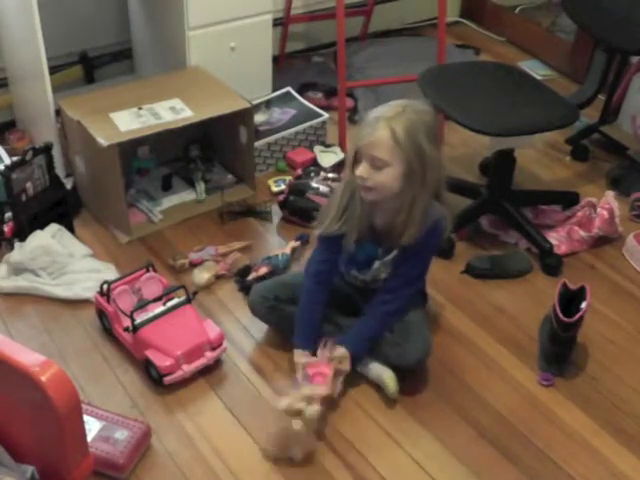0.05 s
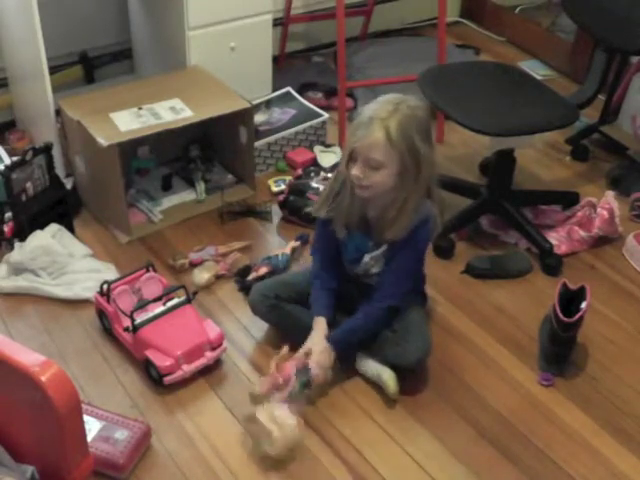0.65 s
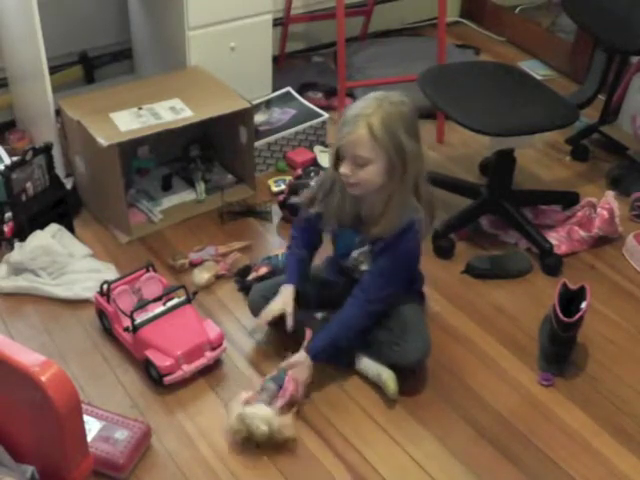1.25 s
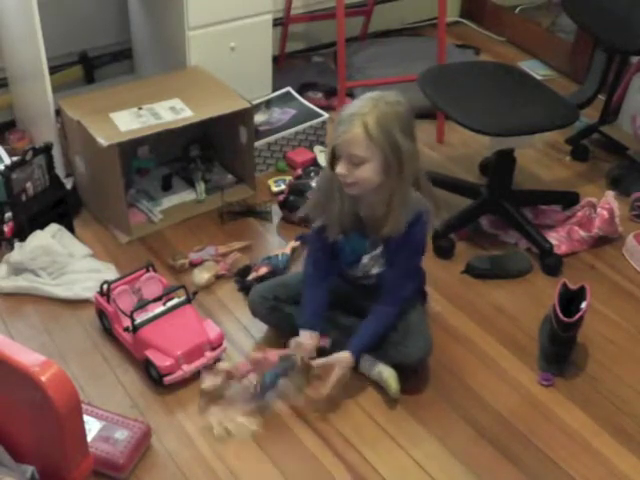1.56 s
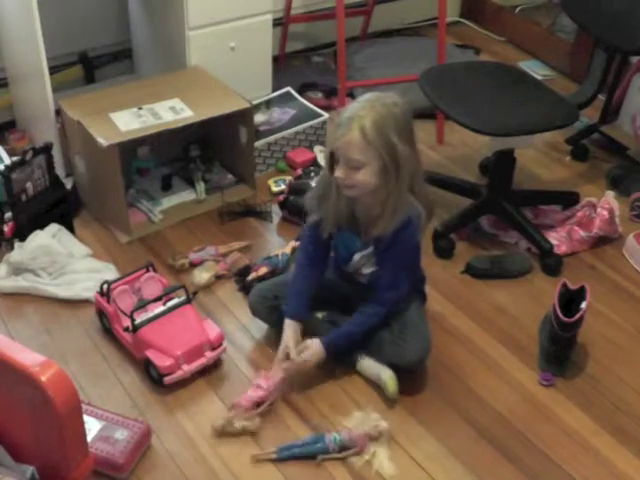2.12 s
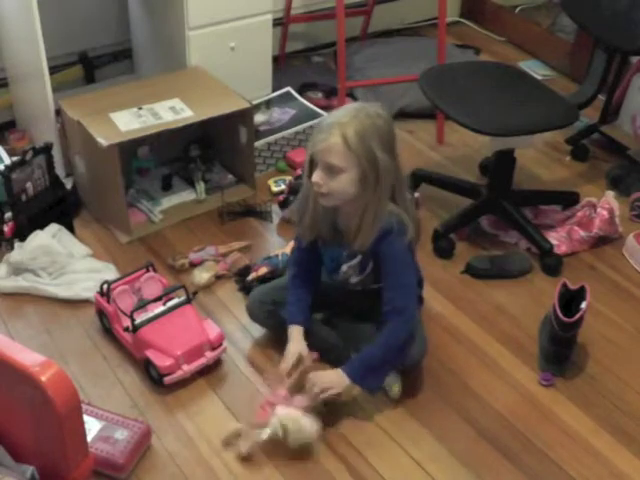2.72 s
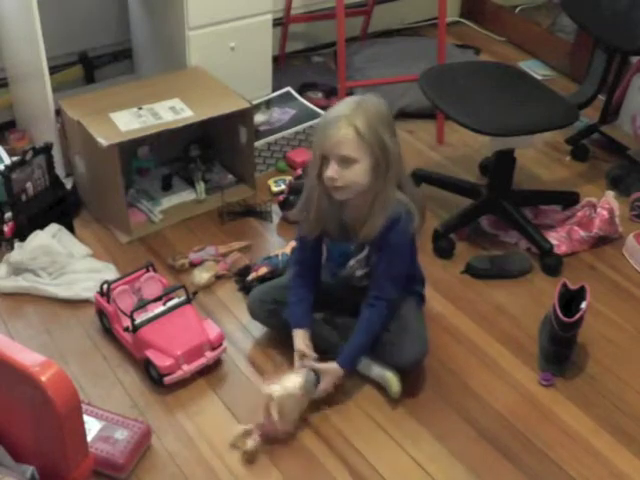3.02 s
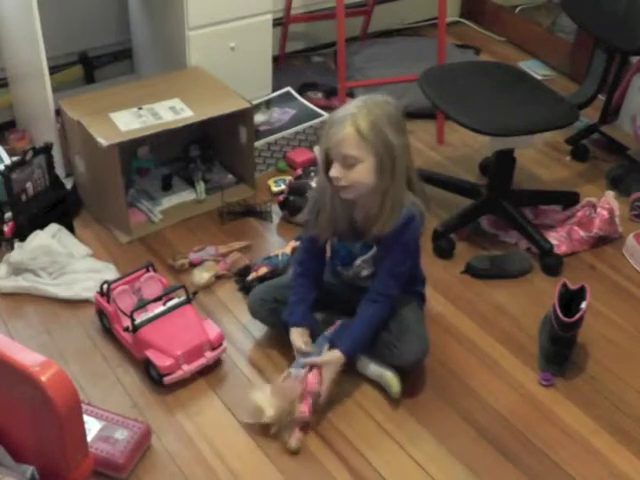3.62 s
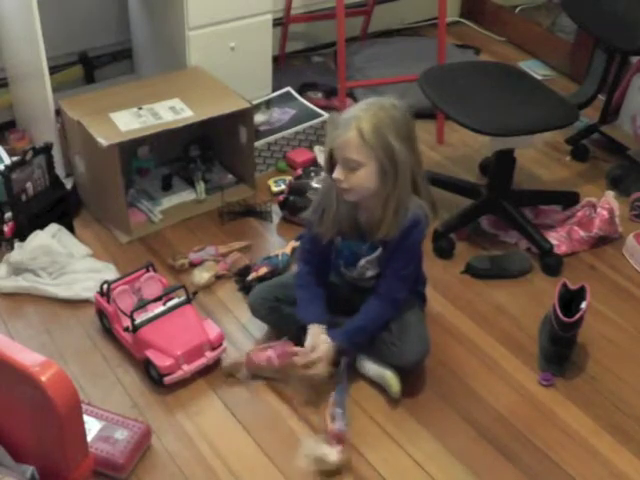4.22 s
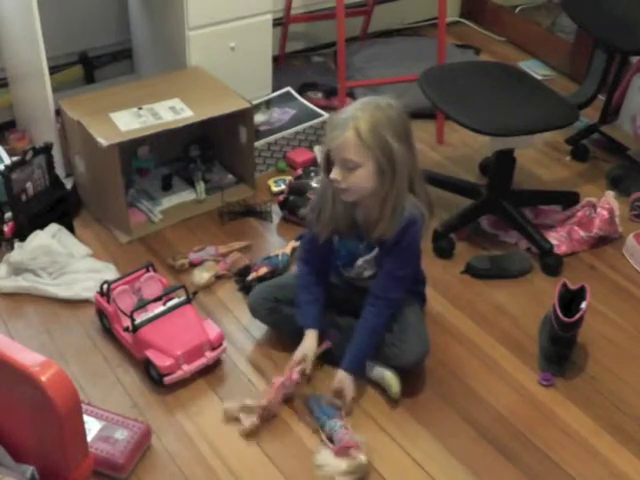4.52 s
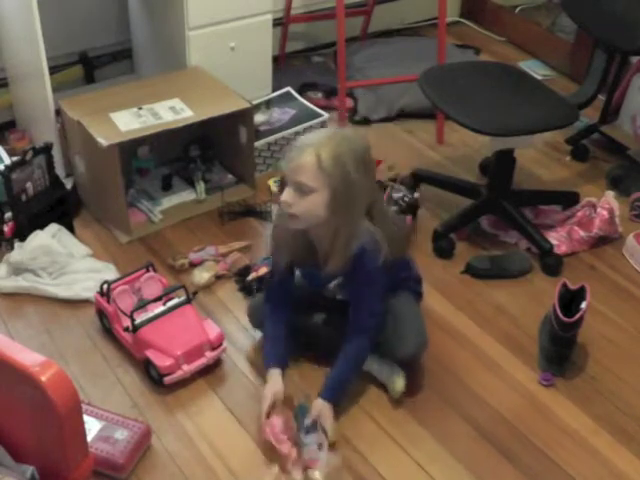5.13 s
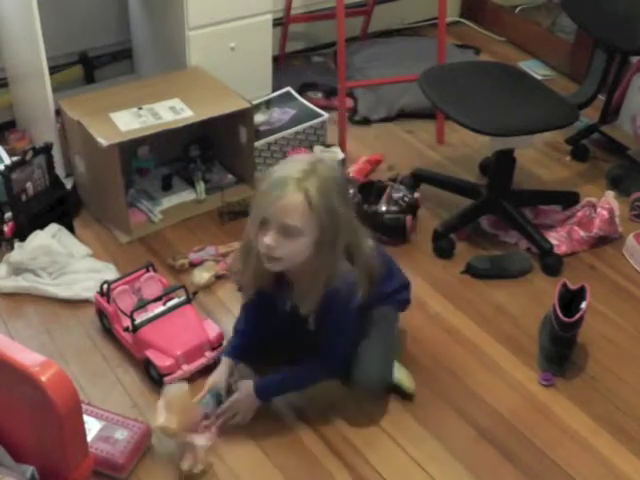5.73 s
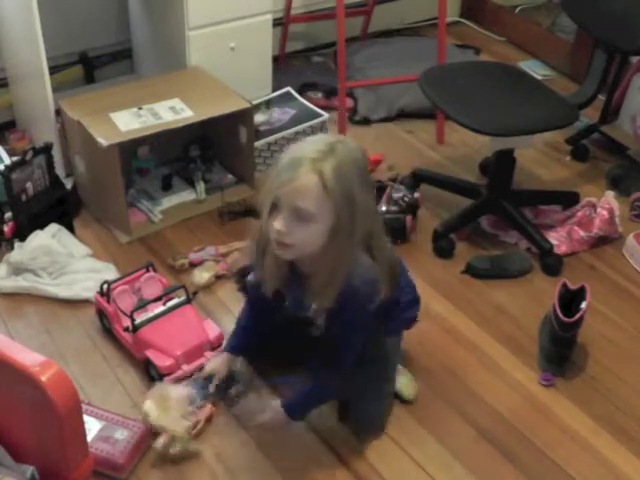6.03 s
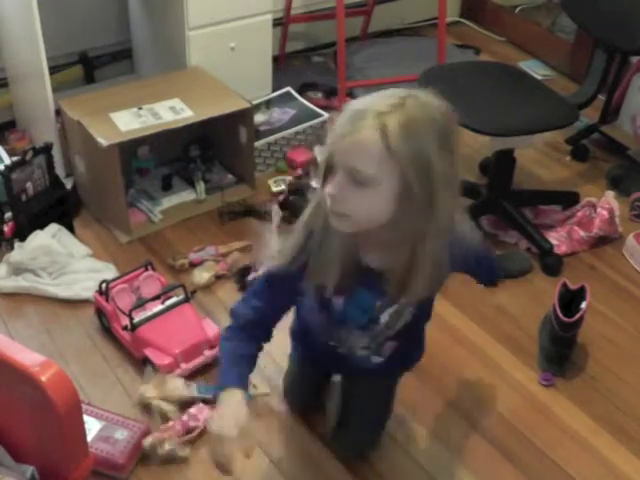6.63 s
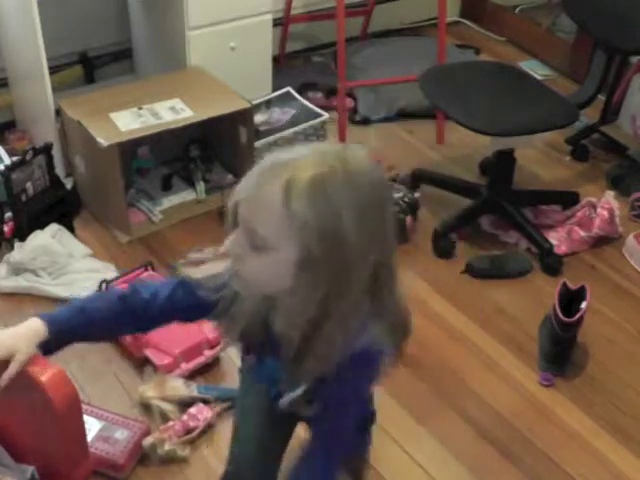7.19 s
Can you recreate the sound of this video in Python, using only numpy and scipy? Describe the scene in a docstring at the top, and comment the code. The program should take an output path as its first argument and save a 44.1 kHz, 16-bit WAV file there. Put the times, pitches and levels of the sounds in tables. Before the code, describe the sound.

Uneven wooden knocks and bright plastic clicks come from dolls being played with on floorboards, bunching into quick clatters with one short dragging scrape. Later the floor gives a low groan, and the clicking gives way to a few dull thuds and a knee rubbing along the wood. Soft cloth rustle and a faint house hush lie underneath. The microphone picks up the brief ring of a small room, with the thumps slightly to the right.

```python
"""A plastic doll thumps on a wooden floor, and clothes rustle as a child plays in a small, quiet room.
Each thump shakes the floorboards and makes the room ring. Two dolls' hard limbs click and clatter,
their hollow bodies give a dry "tock", and one doll scrapes as it is dragged across the floor.
Near the end a board groans, the child shuffles onto the knees with duller thuds, and a sleeve swishes.
The hits are built from quickly fading tones, the rubbing sounds from noise and tiny slips."""
import sys
import numpy as np
from scipy import signal
from scipy.fft import rfft, irfft, next_fast_len
from scipy.io import wavfile
from scipy.ndimage import uniform_filter1d

SR = 44100
rng = np.random.default_rng(int(sys.argv[2]) if len(sys.argv) > 2 else 0)


def master(y):
    """Save y as 16-bit WAV."""
    cut = np.clip(np.atleast_2d(y).T, -1, 1)
    pcm = np.round(cut * 32767)  # scale
    wavfile.write(sys.argv[1], SR, pcm.astype(np.int16))


N = 320166

# a doll lands on the boards; body, hardness and clack set its low-middle, middle and high tones:
# start_s, boom_db, body_db, hardness_db, clack_db, pitch_ratio, wall_distance_m
DOLL_THUMPS = [(-.035, -17, 7, 2, 4, 1, 1.58), (.4448, -16, 0, 0, -6, .96, 1.88),
               (.9015, -12.5, 0, -5, -7, .97, .96), (.9196, -23, 7, 8, 15, 1.1, .96),
               (1.2345, -14.5, 1, 2, -4, 1.02, .36), (1.5313, -11.5, -2, 1, 0, 1.05, 2.56),
               (1.871, -21, -8, -14, -23, .95, .6), (1.91, -23, -4, -9, -12, 1, 3),
               (2.002, -15, 2, 8, 9, 1.01, 2.88), (2.1115, -21, 3, 3, -7, 1, 2.9),
               (2.243, -21, -9, -3, -7, 1, 2.56), (2.465, -30, 2, 2, 4, .97, 2.94),
               (2.49, -33, 1, -2, 0, 1, 2.94), (2.533, -31, -1, -4, -8, 1.05, 2.94),
               (2.699, -32, -4, -2, 0, 1.05, 2.6), (2.84, -20.5, 4, 2, -2, 1.06, 3.04),
               (2.857, -26, 5, 3, 0, 1, 3.04), (2.889, -20, 4, 5, 6, 1, .32),
               (2.975, -27, 2, 5, 1, 1, 1.38), (3.3372, -25, -11, -12, -24, .95, .94),
               (3.878, -22.5, -3, -7, -15, 1.04, .46), (4.289, -12, 6, 7, 0, 1, 2.86),
               (4.352, -23, -2, -5, -12, 1.1, 1.18), (4.4515, -20, 3, 7, 9, 1.02, 1.24),
               (4.549, -28, -7, -10, -10, 1, 2.9), (4.6545, -25.5, 2, 0, -10, 1, 2.02),
               (5.0325, -23, 1, 3, -3, 1.05, 1.3), (5.2172, -10.5, 2, 2, 0, .98, .3),
               (5.354, -33, -5, -10, -16, 1, .3), (5.585, -32, -2, -3, 9, 1.05, 2.64),
               (5.6216, -32, -10, -12, -10, 1, 2.64), (5.729, -32, -2, 2, 4, 1, .72)]
# the tones a struck floorboard rings with: pitch_hz, level_db, rise_s
BOARD_TONES = [(240, -2, .0014), (335, -10.5, .0026), (423.4, -14, .004), (495, -5, .0019), (590, -9, .002),
               (694.5, -8.5, .0015), (790, -9, .0015), (1190, -15.5, .0012), (1340, -12, .0011),
               (1540, -14, .001), (2800, -29, .00026)]
# low tones that linger between the walls (fade_s is the time to fall 60 dB): pitch_hz, level_db, fade_s
ROOM_TONES = [(144, 12.5, .8), (160, 22, .39), (201, 17.5, .25), (255, 13, .35), (302, 20, .23),
              (358, 18.5, .23), (420, 16.5, .27), (468, 11.5, .2), (515, 3, .17), (665, 15, .34)]
# tone colour (how strong each pitch is) of the room's echo: pitch_hz, level_db
ECHO_COLOUR = [(100, 9), (140, 10.5), (200, 3), (300, 5.5), (400, 4.3), (800, 4.8), (1500, 1.5),
               (3000, 3.5), (6000, 1.5), (10000, 0), (16000, 0)]
# how strong the left-right difference is, next to what both sides share: pitch_hz, level_db
STEREO_WIDTH = [(25, -14), (60, 1), (160, -6.5), (350, -6), (700, -4.5), (1400, -4.5), (2800, -8),
                (5600, -17), (9000, -6.5), (14000, -8)]
# tone colour of the quiet house: pitch_hz, level_db
HUSH_COLOUR = [(25, -24), (42, -17), (60, 6.5), (85, -14), (140, -7.5), (260, 3), (550, -6), (1300, -6.5),
               (2400, -20.5), (6500, -16.5), (9000, -29), (16000, -37)]
# tone colour of rubbing cloth: pitch_hz, level_db
CLOTH_COLOUR = [(100, -20), (250, -5), (700, -15), (1500, -8), (3200, 6.5), (5500, -1.5), (7300, 0.5),
                (10000, -6.5), (16000, -28)]
# clothes and doll hair brush in big movements: full_from_s, full_until_s, level_db, rise_s, fall_s
BIG_MOVES = [(.36, .42, -60, .3, .3), (3.8, 3.9, -59, .4, .2), (4.08, 4.22, -62, .2, .3),
             (5.15, 5.85, -58.5, .15, .12), (6.13, 6.65, -60, .15, .25)]
# a hard limb hits the other doll or the floor; hollow is high on wood, edge is the highest treble:
# start_s, level_db, ring_hz, ring_db, hollow_db, edge_db
LIMB_TAPS = [(.185, -35, 5800, -2, -20, 0), (.445, -30, 5800, -4, -19, 0), (.6372, -35.5, 6360, -3, 2, 0),
             (.826, -31, 5340, -3, -3, 0), (.85, -34, 5800, -2, -16, 0), (.901, -28, 6500, -8, -12, 2),
             (.908, -19.5, 5600, 2, -8, -2), (.9196, -29, 6200, -6, -15, 0),
             (1.2343, -21, 6100, -4, -28, -5), (1.2795, -33.5, 5420, -3, 9, 0),
             (1.4585, -25, 6100, -8, -45, 7), (1.532, -29, 6000, -4, -30, 0),
             (1.745, -32.5, 6360, -2, -20, 0), (1.777, -39, 5600, -3, 0, 0), (1.871, -32, 5800, -4, -19, 0),
             (1.9101, -20, 6000, -8, -6, -3), (1.952, -10.5, 6200, -4, -24, -3),
             (1.9802, -22, 6500, -6, -10, -1), (2.002, -26, 6800, -4, -19, 0),
             (2.112, -32, 5600, -2, -19, 0), (2.1668, -22, 6800, 0, -11, -4),
             (2.2435, -28, 5800, -4, -19, 2), (2.2495, -24, 5700, -8, -1, -2),
             (2.4648, -29, 6100, -1, -12, -3), (2.5333, -25, 5800, 0, -19, 0),
             (2.581, -20.5, 5600, -6, -10, 0), (2.6275, -18, 5850, -3, -25, 0),
             (2.643, -21, 6300, -2, -25, 0), (2.6985, -22, 6700, -5, -18, -1),
             (2.839, -33, 6200, -4, -19, 0), (2.8575, -18, 6400, -5, -20, -1),
             (2.8715, -14, 6100, -5, -17, -2), (2.8752, -20, 7000, -4, -19, 0),
             (2.8845, -21, 6300, -5, -19, 0), (2.889, -27, 5800, -4, -19, 0),
             (2.975, -31, 6000, -3, -19, 0), (3.003, -32, 7200, 2, -30, 0),
             (3.036, -31.5, 5700, -2, -45, 0), (3.3484, -24, 6050, 4, -45, -3),
             (3.3784, -23.5, 5220, 2, -45, 2), (3.4583, -31, 5250, -2, -11, 0),
             (3.878, -30, 5600, -5, -14, 0), (4.0715, -27, 5340, -3, -14, 0),
             (4.206, -35, 6260, -3, -17, 0), (4.289, -22, 6000, -3, -19, -2),
             (4.3225, -26, 7600, 0, -20, 2), (4.3996, -27.5, 6500, -3, -2, -1),
             (4.452, -19, 5400, -10, -7, 1), (4.4583, -16, 5900, 3, -28, 4),
             (4.549, -10.5, 6550, 7, -20, -13), (4.655, -21.5, 5600, 0, -15, -1),
             (5.033, -10, 5550, 1, -21, 0), (5.1574, -28, 5220, -4, -16, 0),
             (5.215, -14, 6100, -7, -12, -3), (5.354, -24, 5600, -6, -20, 5),
             (5.3574, -24, 7100, -2, -20, 4), (5.443, -29, 7090, -4, -5, 0),
             (5.5384, -32, 5970, -8, -22, 2), (5.615, -28, 5200, -8, -14, 3),
             (5.623, -21, 6000, -8, -18, 6), (5.632, -27, 6600, -8, -18, 4),
             (5.7705, -16, 6300, -7, -14, 2), (5.7725, -15, 5350, 0, -22, 1), (5.833, -28, 7300, 2, -25, 0),
             (5.844, -30, 6400, -6, -20, 0), (6.0225, -28.5, 5530, -6, -16, 0),
             (6.2055, -35, 5330, -3, -3, -4), (6.2498, -36.5, 5430, -3, 0, -4)]
# the tones of a doll's plastic shell: pitch_hz, level_db, fade_s
SHELL_TONES = [(1460, -15.5, 0.0023), (1750, -11, 0.0035), (2760, -4.5, 0.0031), (3530, -8, 0.003),
               (5540, -11, 0.0025), (6820, -6, 0.0022)]
# tone colour of the crack as hard plastic hits: pitch_hz, level_db
CRACK_COLOUR = [(200, 1), (1000, -10), (3000, 1), (6000, 8.5), (8000, -3.5), (10000, -3), (13000, -15),
                (16000, -23.5)]
# a torso or a smaller hollow part is bumped: start_s, level_db, pitch_hz
TORSO_BUMPS = [(.637, -36, 1600), (.9085, -25, 1450), (.92, -22, 1780), (1.911, -28, 1450),
               (2.2495, -22, 1700), (2.465, -33, 1300), (2.581, -26, 1350), (2.6985, -14.5, 1510),
               (4.4, -33, 1560), (4.549, -27, 1500), (4.9973, -33, 1480), (5.033, -20, 2750),
               (5.456, -33, 1250), (5.585, -26, 1420), (5.727, -32, 1350), (5.771, -21, 3150),
               (6.016, -39, 1600)]
# the tones of the hollow torso: pitch_ratio, level_db, fade_s
TORSO_TONES = [(1, 0, .016), (1.16, -4, .012), (1.85, -7, .006), (2.3, -11, .006), (3.9, -15, .003)]
# a dragged torso rasps, higher as it turns: full_from_s, full_until_s, level_db, rise_s, fall_s, pitch_hz
TORSO_RASPS = [(2.485, 2.5, -52, .05, .1, 1330), (2.585, 2.62, -43.5, .16, .15, 1330),
               (2.66, 2.705, -46.5, .2, .11, 1520)]
# tone colour of the boards as something slides on them: pitch_hz, level_db
SLIDE_COLOUR = [(150, -16), (400, -6), (560, -0.5), (660, -1), (800, -2.5), (950, -12), (1500, -17.5),
                (2200, -29), (6000, -18), (16000, -55)]
# tone colour of a groaning board: pitch_hz, level_db
LOW_WOOD_COLOUR = [(60, -40), (110, -21), (200, -8.5), (300, 2.5), (380, -14.5), (540, -11.5), (900, -17),
                   (2000, -29), (8000, -70)]
# the child's feet, knees and hand take weight: start_s, boom_db, hardness_db, wall_distance_m
CHILD_THUDS = [(5.835, -24, -4, 2.62), (5.853, -30, 4, 2.62), (6.091, -33, -12, 2.42),
               (6.135, -36.5, 4, 2.42), (6.245, -35, -9, 1.78), (6.281, -33.5, -2, 1.78),
               (6.5715, -21.5, -5, 3.1), (6.927, -18, -8, 1.22), (6.958, -25, -12, 1.22)]
# a knee slides in short pushes: full_from_s, full_until_s, level_db, rise_s, fall_s
KNEE_PUSHES = [(6.385, 6.54, -50, .03, .1), (6.458, 6.468, -41, .05, .08), (6.58, 6.62, -38, .1, .075)]
# tone colour of a swishing sleeve: pitch_hz, level_db
SWISH_COLOUR = [(1000, -26), (3500, -18), (5500, -2), (7400, 2.5), (9500, -10), (16000, -28)]
# bands of pitch that the microphone picks up weakly: pitch_hz, width_hz, depth_db
MICROPHONE_DIPS = [(991, 71, -29.5), (2200, 1000, -2.8), (4590, 220, -37.5)]

CLICK_HZ = 5800   # the usual ring of a limb
RING_TIME = np.arange(int(.45 * SR)) / SR   # seconds since a hit


def from_db(db):
    """Turn decibels into a number to multiply a sound by."""
    return 10 ** (np.asarray(db) / 20)


def rms_one(x):
    """Scale a sound so that its average power is one."""
    return x / np.sqrt(np.mean(x ** 2) + 1e-20)


def at_hz(points, hz):
    """Read the level at any pitch from a list of (pitch_hz, level_db) points."""
    known, value = np.transpose(points)
    return np.interp(np.log(np.maximum(hz, 1)), np.log(known), value)


def fade(t, fade_s):
    """Die away by 60 dB every fade_s seconds."""
    return np.exp(-np.log(1000) * t / fade_s)


def swell(full_from_s, full_until_s, level_db, rise_s, fall_s):
    """Loudness of one movement: it climbs 30 dB in rise_s, holds, then drops 30 dB in fall_s."""
    t = np.arange(N) / SR
    outside = np.maximum(full_from_s - t, 0) / rise_s + np.maximum(t - full_until_s, 0) / fall_s
    return from_db(level_db - 30 * np.minimum(outside, 10))


def let_through(x, hz, kind, order=2):
    """Keep the part of a sound below ("low") or above ("high") a pitch."""
    return signal.sosfilt(signal.butter(order, hz, kind, fs=SR, output="sos"), x)


def add(out, start_s, sound):
    """Mix a sound in at a time, trimming what falls outside."""
    at = int(round(start_s * SR))
    first, last = max(at, 0), min(at + sound.shape[-1], out.shape[-1])
    out[..., first:last] += sound[..., first - at:last - at]


def stereo_noise(colour, size):
    """Noise with a given tone colour, a little different on the left and the right."""
    padded = next_fast_len(size)
    hz = np.arange(padded // 2 + 1) * SR / padded
    mid, side = rfft(rng.standard_normal((2, padded))) * from_db(at_hz(colour, hz))
    side = side * from_db(at_hz(STEREO_WIDTH, hz))
    return irfft(np.array([mid + side, mid - side]), padded)[:, :size]


def doll_thumps(on_wood_above_db=-17):
    """Light dolls land on the boards; limbs that tap the wood stir mostly its high tones."""
    light_blow = (1, 2, 15, 1, 2.6)   # body_db, hardness_db, clack_db, pitch_ratio, wall_distance_m
    floor_taps = [(start_s, level_db + hollow_db - 9, *light_blow)
                  for start_s, level_db, _, _, hollow_db, _ in LIMB_TAPS if hollow_db > on_wood_above_db]
    return floorboards(list(DOLL_THUMPS) + floor_taps, slowdown=.93)


def floorboards(blows, slowdown, scatter_db=1, lag_s=.0003):
    """Struck boards ring briefly. Harder blows wake higher tones; a heavy load slows the shaking."""
    sounds = []
    for start_s, boom_db, body_db, hardness_db, clack_db, pitch_ratio, _ in blows:
        clock = RING_TIME[:SR // 20] / slowdown * pitch_ratio
        colour = [(260, 0), (380, body_db), (500, hardness_db),
                  (800, .45 * hardness_db + .3 * clack_db + .8), (1300, clack_db)]
        ring = np.zeros(len(clock))
        for hz, level_db, rise_s in BOARD_TONES:
            t = np.maximum(clock - lag_s * BOARD_TONES[0][0] / hz, 0)   # low tones arrive last
            gain = from_db(level_db + at_hz(colour, hz) + scatter_db * rng.standard_normal())
            ring += gain * t / rise_s * np.exp(1 - t / rise_s) * np.sin(2 * np.pi * hz * t)
        ring = let_through(ring, 162 / slowdown, "high", order=5)   # narrow boards give little deep bass
        thump = ring.copy()
        for delay_s in (.0039, .008):   # the wave bounces back from the beams under the floor
            add(thump, delay_s / pitch_ratio, from_db(-10.5) * ring)
        sounds.append((start_s, from_db(boom_db - 4.5) * thump))
    wall_distances_m = [blow[-1] for blow in blows]
    return in_room(sounds, echo_db=-1, build_s=.002) + room_ring(sounds, wall_distances_m)


def in_room(sounds, echo_db, build_s, low_fade_s=.32, high_fade_s=.22, split_hz=2500):
    """Each (start_s, sound) arrives directly, then with its own echo, whose highs fade first."""
    out = np.zeros((2, N))
    t = RING_TIME[:10240]
    echo_gain = from_db(echo_db) * np.sqrt(2 * np.log(1000) / (high_fade_s * SR))
    build = echo_gain * (1 - np.exp(-t / build_s))
    low_decay, high_decay = build * fade(t, low_fade_s), build * fade(t, high_fade_s)
    for start_s, sound in sounds:
        noise = smooth_echo(stereo_noise(ECHO_COLOUR, len(t)), low_decay)
        lows = let_through(noise, split_hz, "low", order=1)
        tail = lows * low_decay + (noise - lows) * high_decay
        add(out, start_s, signal.fftconvolve(tail, sound[None], axes=1))
        add(out, start_s, sound)
    return out


def smooth_echo(noise, decay):
    """Even out the echo's noise so that it dies away smoothly, with no pitch standing out."""
    colour = from_db(at_hz(ECHO_COLOUR, np.linspace(0, SR / 2, len(decay) // 2 + 1)))
    power = np.abs(rfft(noise.mean(0) * decay) / colour) ** 2
    return irfft(rfft(noise) * np.sqrt(power.mean() / uniform_filter1d(power, size=25)), len(decay))


def room_ring(sounds, wall_distances_m, place_db=3, sound_m_per_s=343):
    """Low tones linger between the walls, louder or softer depending on where the floor is hit."""
    hz, level_db, fade_s = np.transpose(ROOM_TONES)[:, :, None]
    gains = from_db(level_db) * 2 * np.log(1000) / (fade_s * SR)
    tones = gains * fade(RING_TIME, fade_s) * np.cos(2 * np.pi * hz * RING_TIME)
    out = np.zeros(N)
    for (start_s, sound), distance_m in zip(sounds, wall_distances_m):
        strong_spot = np.cos(2 * np.pi * hz * 2 * distance_m / sound_m_per_s)   # 1 strong, -1 weak
        ring = np.sum(from_db(place_db * strong_spot) * tones, axis=0)
        add(out, start_s, signal.fftconvolve(sound, ring))
    return out


def house_hush(level_db=-52.5):
    """The faint, steady noise of a quiet house."""
    return from_db(level_db) * rms_one(stereo_noise(HUSH_COLOUR, N))


def clothes_rustle(fidget_db=-72):
    """Clothes and doll hair stir in big movements and as the arm swings, more for a heavier thump."""
    swings = [swell(start_s - .06, start_s + .03, -57.5 + .3 * boom_db, rise_s=.4, fall_s=.5)
              for start_s, boom_db, *_ in DOLL_THUMPS]
    brushes = [swell(*move) for move in BIG_MOVES]
    loudness = np.maximum(from_db(fidget_db), np.max(swings + brushes, axis=0))
    return rubbing(CLOTH_COLOUR, loudness, roughness_db=3.9, catches_per_s=110)


def rubbing(colour, loudness, roughness_db, catches_per_s=130):
    """A rubbed surface catches and lets go many times a second, so its noise flutters."""
    t = np.arange(N) / SR
    catching = np.interp(t * catches_per_s, np.arange(N // 100), rng.standard_normal(N // 100))
    return rms_one(stereo_noise(colour, N)) * loudness * from_db(roughness_db * catching)


def doll_clatter(boost_db=9.8, rattle_db=-8, rattle_s=.0018):
    """Limbs click, joints tick and torsos tock; after each click a loose joint touches again."""
    hits = []
    for start_s, level_db, ring_hz, *tone in list(LIMB_TAPS) + joint_ticks():
        click = plastic_click(ring_hz, *tone)
        delay_s = rattle_s * rng.uniform(.2, 1)
        rattle = plastic_click(ring_hz * rng.uniform(.856, 1.166), *tone)
        add(click, delay_s, from_db(rattle_db) * rattle)
        hits.append((start_s, from_db(level_db + boost_db) * click))
    for start_s, level_db, pitch_hz in TORSO_BUMPS:
        hits.append((start_s, from_db(level_db + boost_db) * torso_tock(pitch_hz)))
    return in_room(hits, echo_db=-1.5, build_s=.0025, high_fade_s=.21)


def plastic_click(ring_hz, ring_db, hollow_db, edge_db, scatter_db=1.5, detune=.036, contact_s=.00024):
    """A hit cracks and rings the limb and the doll's shell, whose tones shift with the spot struck."""
    t = RING_TIME[:SR // 50]
    sound = from_db(ring_db) * fade(t, .0028) * np.sin(2 * np.pi * ring_hz * t)
    sound += from_db(-6) * fade(t, .003) * rms_one(stereo_noise(CRACK_COLOUR, len(t))[0])
    hollow_colour = [(2300, min(hollow_db, -6) + 14), (5200, 0)]   # capped, so hollow hits stay bright
    spot_ratio = (ring_hz / CLICK_HZ) ** .6
    for hz, level_db, fade_s in SHELL_TONES:
        strength, shift = rng.standard_normal(2)
        gain = from_db(level_db + at_hz(hollow_colour, hz) + scatter_db * strength)
        pitch_hz = hz * spot_ratio * (1 + detune * shift)
        sound += gain * fade(t, fade_s) * np.sin(2 * np.pi * pitch_hz * t)
    edge = from_db(at_hz([(6500, 0), (9500, edge_db)], np.linspace(0, SR / 2, len(t) + 1)))
    sound = irfft(rfft(sound, 2 * len(t)) * edge)[:len(t)]
    sound *= 1 - np.exp(-t / contact_s)
    sound = let_through(sound, 390, "high")   # small parts give no bass
    return sound / np.sqrt(np.sum(sound ** 2))


def joint_ticks(ticks_per_s=2, level_db=-46, spread_db=3, hollow_db=-15):
    """Joints tick faintly at random as the dolls are handled; gives rows like those of LIMB_TAPS."""
    return [(when * N / SR, level_db + spread_db * (2 * size - 1), CLICK_HZ, 0, hollow_db, 0)
            for when, size in rng.random((int(ticks_per_s * N / SR), 2))]


def torso_tock(pitch_hz):
    """The hollow body rings briefly when bumped."""
    t = RING_TIME[:SR // 40]
    sound = np.zeros(len(t))
    for ratio, level_db, fade_s in TORSO_TONES:
        phase = rng.uniform(0, 2 * np.pi)
        sound += from_db(level_db) * fade(t, fade_s) * np.sin(2 * np.pi * ratio * pitch_hz * t + phase)
    sound = let_through(sound, 700, "high", order=4)
    return sound / np.sqrt(np.sum(sound ** 2))


def doll_drag(plastic_db=-4, wood_db=-11, rumble_db=-9, touch_points=4):
    """As a doll slides, its limbs scrape finely, its torso rasps and the wood murmurs below."""
    stroke = swell(2.61, 2.67, level_db=-35.5, rise_s=.17, fall_s=.13)
    clicks = [plastic_click(6400 * rng.uniform(.92, 1.08), ring_db=1, hollow_db=-16, edge_db=-5)
              for _ in range(touch_points)]
    plastic = slipping(clicks, slips_per_s=420) * stroke
    for *move, pitch_hz in TORSO_RASPS:
        tocks = [torso_tock(pitch_hz * rng.uniform(.92, 1.08)) for _ in range(touch_points)]
        plastic += slipping(tocks, slips_per_s=400) * swell(*move)
    wood = rubbing(SLIDE_COLOUR, from_db(wood_db) * stroke, roughness_db=3)
    rumble = rubbing(LOW_WOOD_COLOUR, from_db(rumble_db) * stroke, roughness_db=3)
    return wood + rumble + in_room([(0, from_db(plastic_db) * plastic)], echo_db=1.5, build_s=.0017)


def slipping(rings, slips_per_s):
    """A few touching points slip at random moments, and each slip sets off that point's own ring."""
    slips = [(rng.random(N) < slips_per_s / len(rings) / SR) * rng.standard_normal(N) for _ in rings]
    return rms_one(sum(signal.oaconvolve(kicks, ring)[:N] for kicks, ring in zip(slips, rings)))


def board_groan():
    """A floorboard groans under the child's weight."""
    loudness = swell(5.06, 5.19, level_db=-39, rise_s=.27, fall_s=.7)
    return rubbing(LOW_WOOD_COLOUR, loudness, roughness_db=4.5, catches_per_s=150)


def child_thuds():
    """The child's weight lands on the boards, lower and duller than a doll; harder blows clack more."""
    blows = [(start_s, boom_db, hardness_db / 2, hardness_db, 1.3 * hardness_db - 3.5, 1, distance_m)
             for start_s, boom_db, hardness_db, distance_m in CHILD_THUDS]
    return from_db(-3) * floorboards(blows, slowdown=1.163)


def knee_slide():
    """A knee rubs along the boards in short pushes."""
    loudness = np.max([swell(*push) for push in KNEE_PUSHES], axis=0)
    return rubbing(SLIDE_COLOUR, loudness, roughness_db=2)


def sleeve_swish():
    """A sleeve hisses softly as the arm reaches out."""
    loudness = swell(7.0, 7.15, level_db=-58.5, rise_s=.16, fall_s=.3)
    return rubbing(SWISH_COLOUR, loudness, roughness_db=2.3)


def scene():
    """Mix the play over the hush of the house, with the floor's thumps slightly to the right."""
    hush = house_hush()
    floor = (doll_thumps() + child_thuds()) * from_db([[-.55], [.55]])
    dolls = doll_clatter() + doll_drag()
    child = clothes_rustle() + board_groan() + knee_slide() + sleeve_swish()
    return hush + floor + dolls + child


def record(dry):
    """The microphone's housing weakens three bands of pitch, and the very highest sounds are cut."""
    for hz, width_hz, depth_db in MICROPHONE_DIPS:
        band = signal.lfilter(*signal.iirpeak(hz, hz / width_hz, fs=SR), dry)
        dry = dry + (from_db(depth_db) - 1) * band
    top_cut = signal.ellip(10, .1, 80, 16000, fs=SR, output="sos")   # keeps what is below 16000 Hz
    return signal.sosfilt(top_cut, dry)


dry = scene()
out = record(dry)
master(out)
```